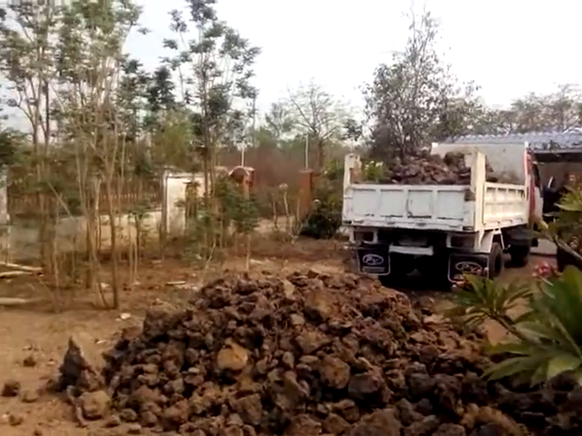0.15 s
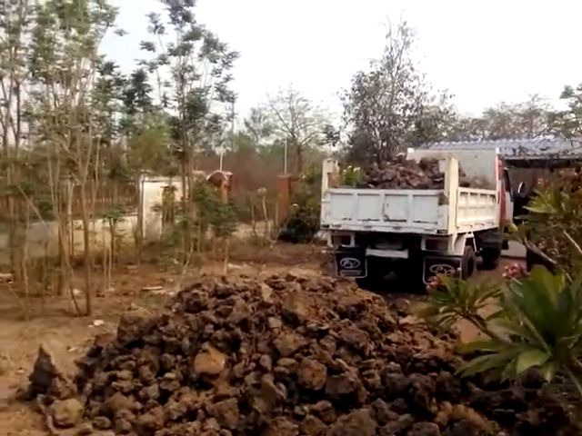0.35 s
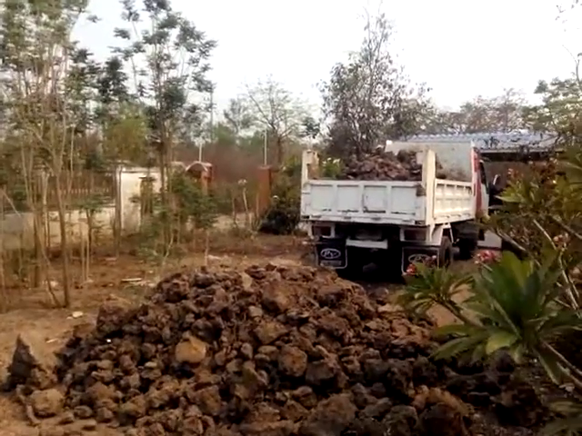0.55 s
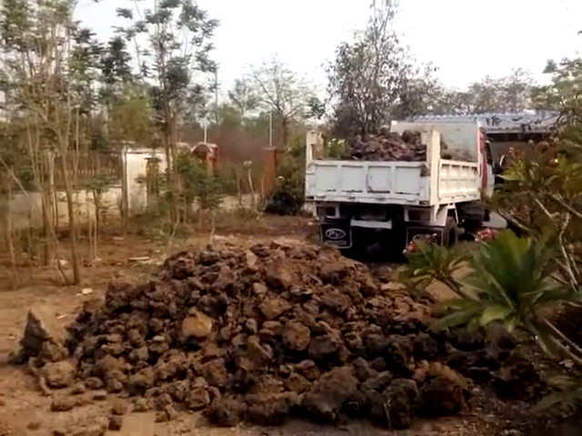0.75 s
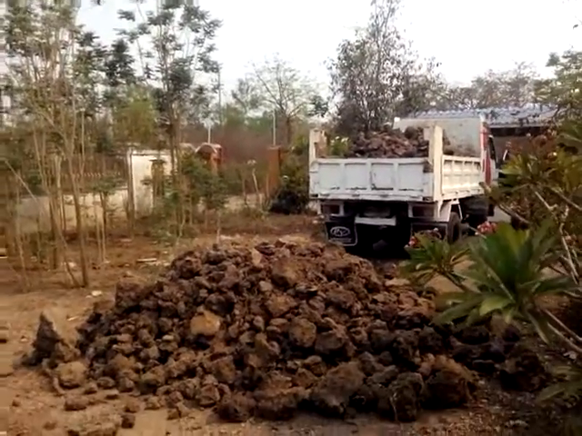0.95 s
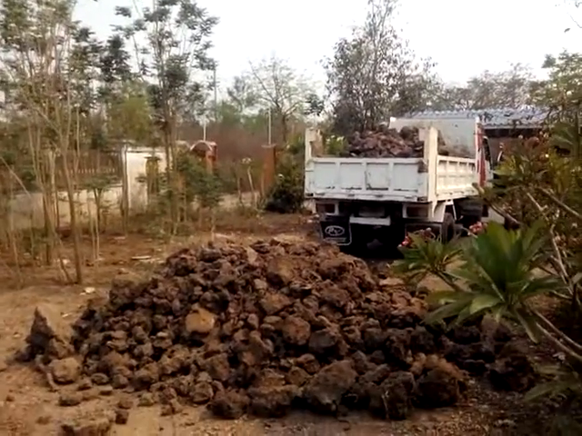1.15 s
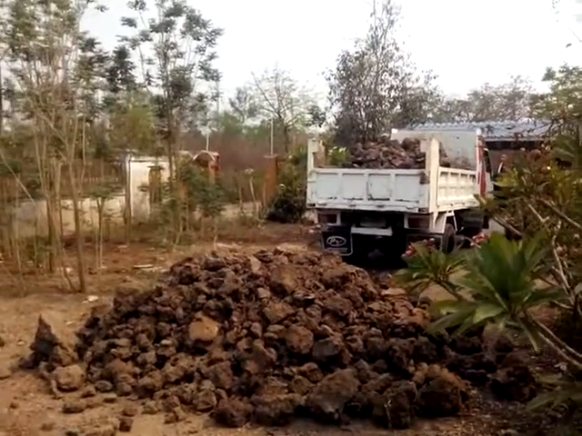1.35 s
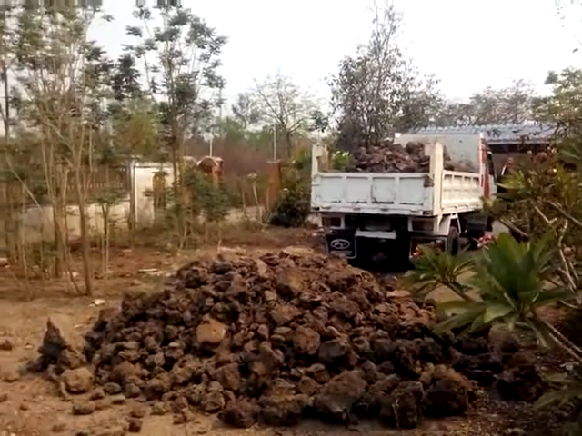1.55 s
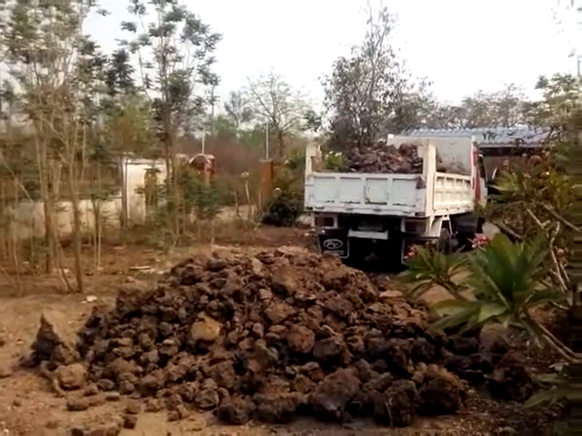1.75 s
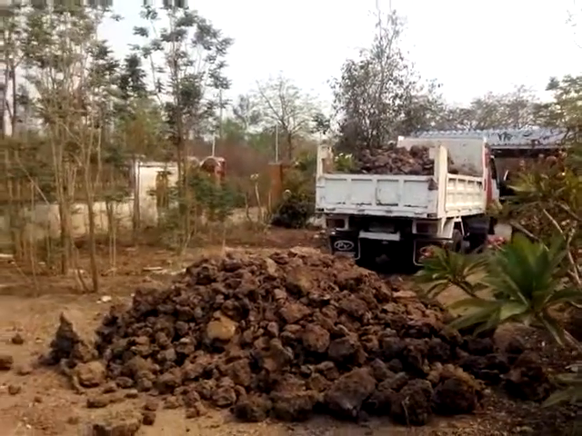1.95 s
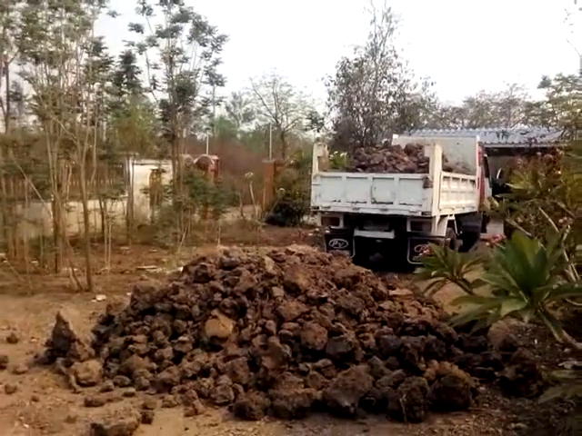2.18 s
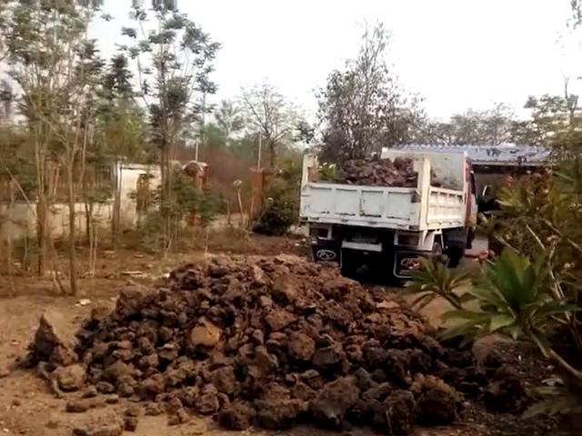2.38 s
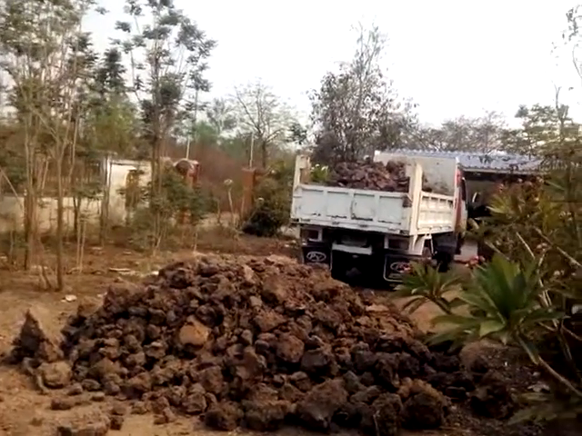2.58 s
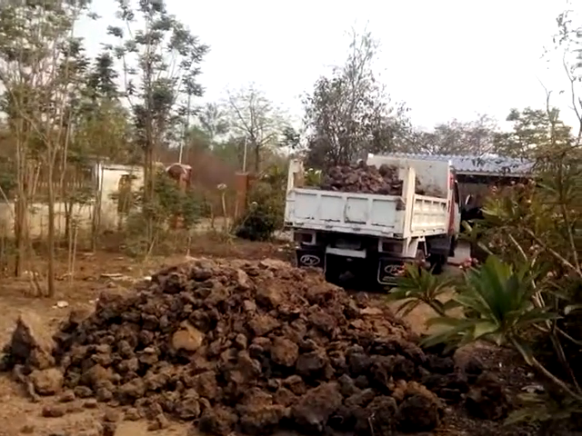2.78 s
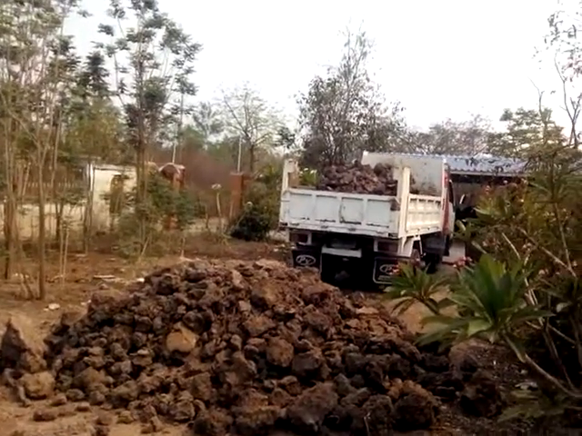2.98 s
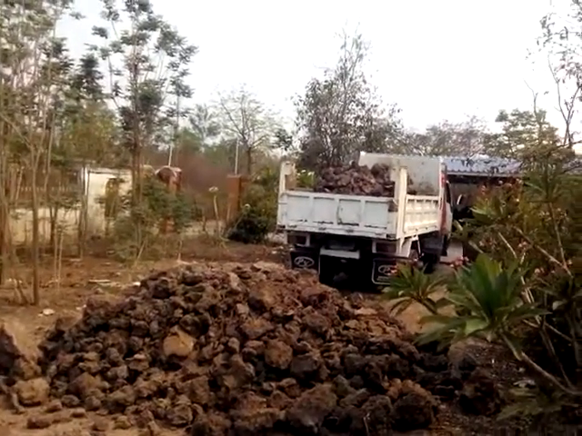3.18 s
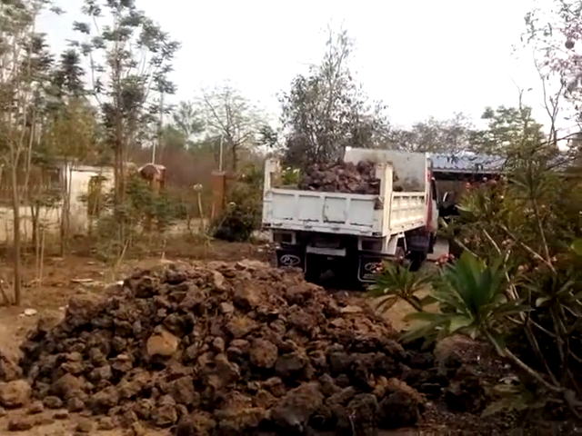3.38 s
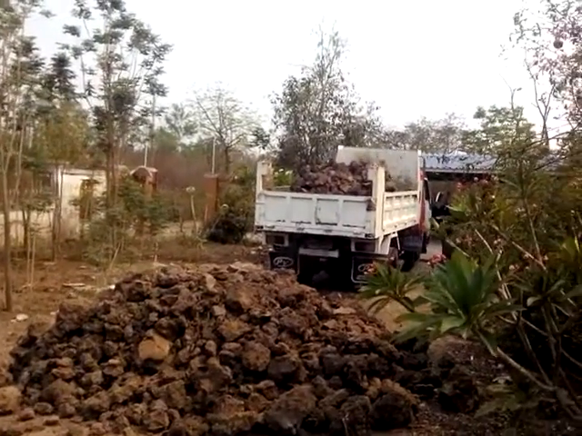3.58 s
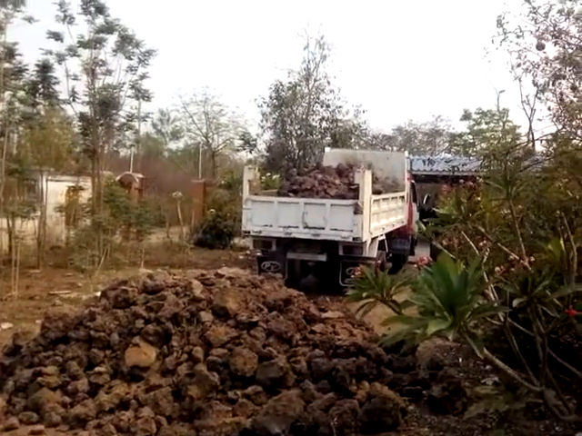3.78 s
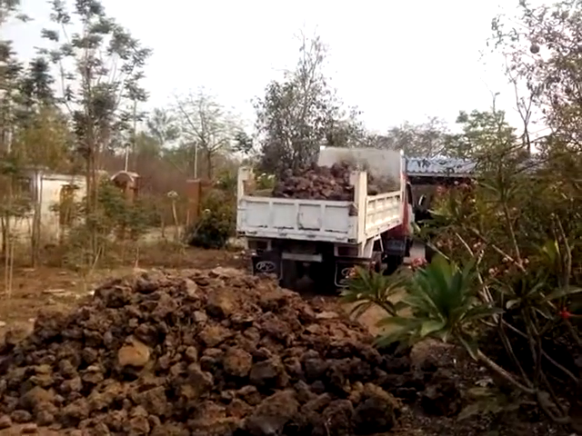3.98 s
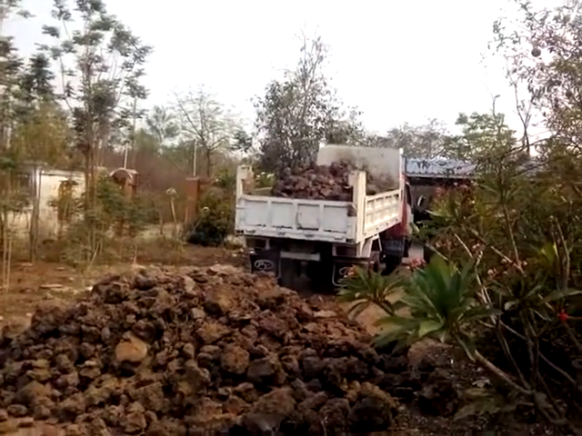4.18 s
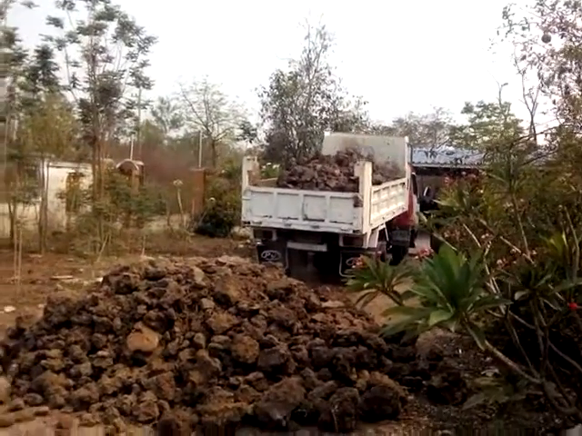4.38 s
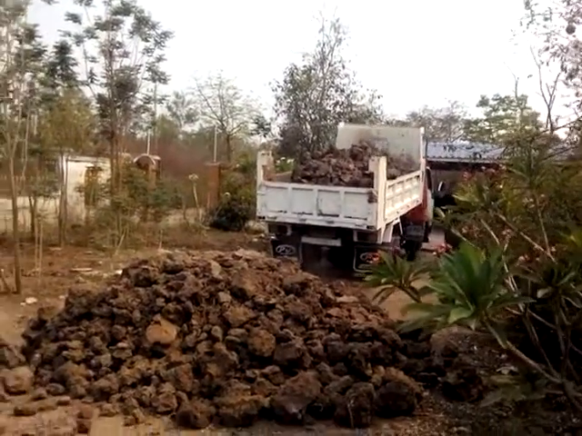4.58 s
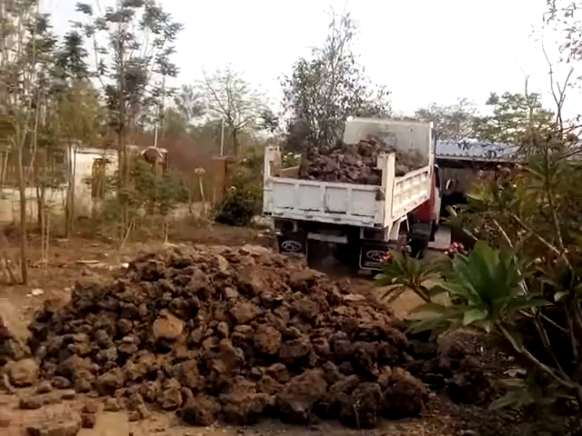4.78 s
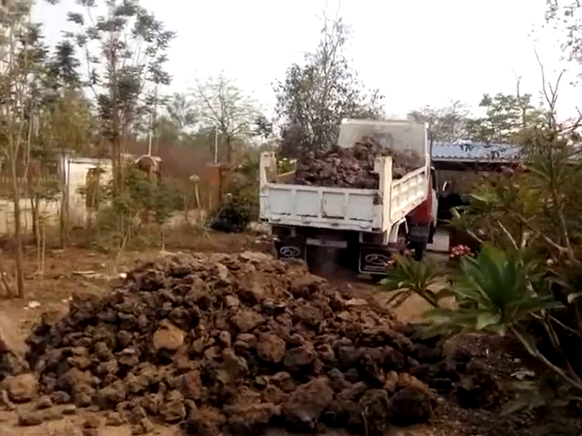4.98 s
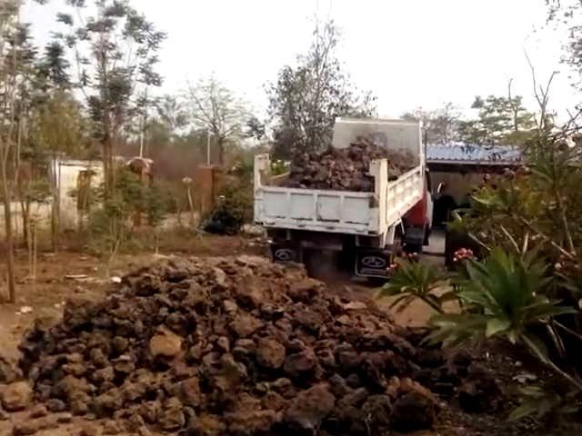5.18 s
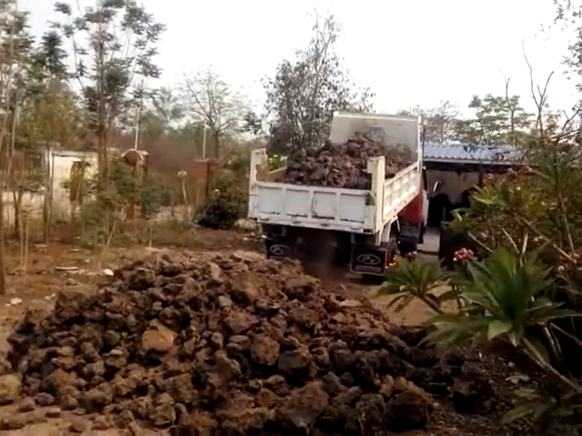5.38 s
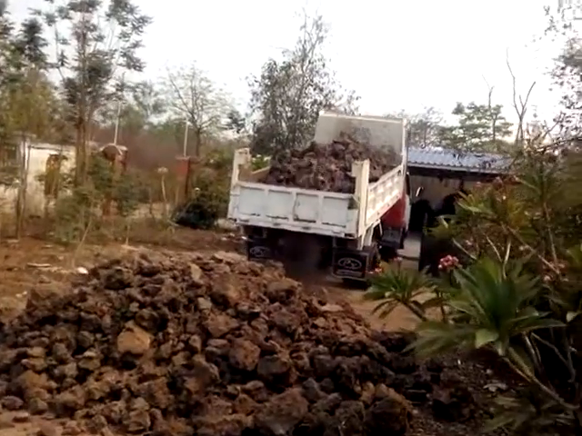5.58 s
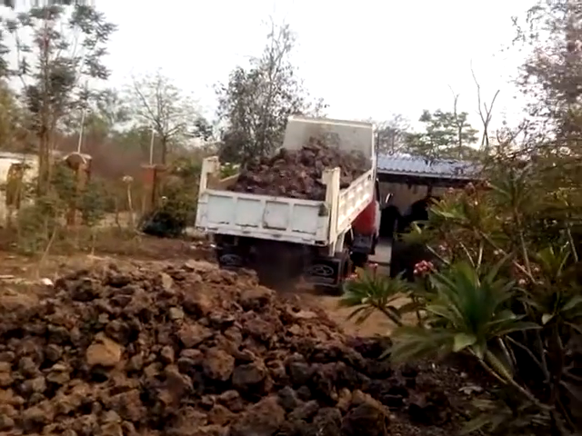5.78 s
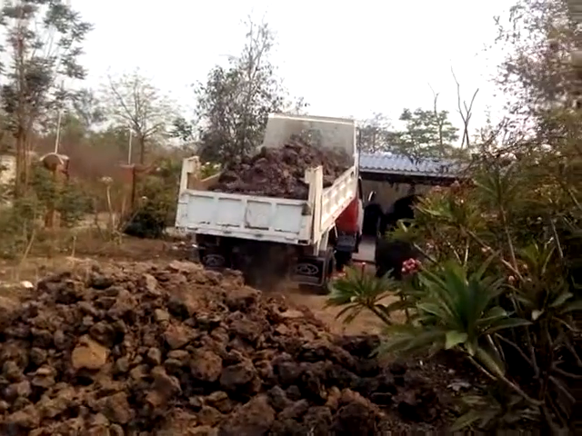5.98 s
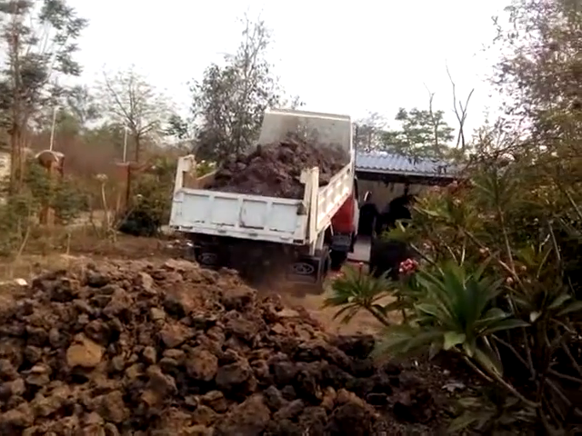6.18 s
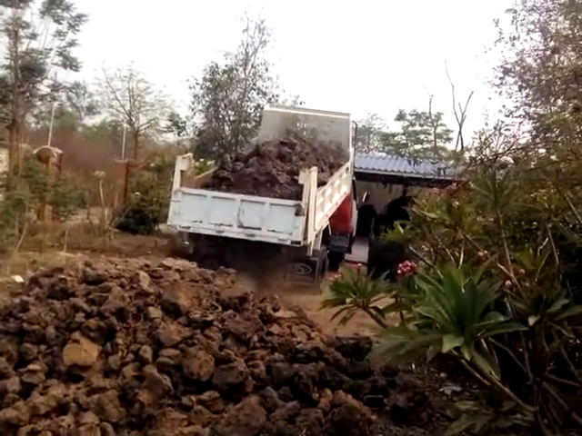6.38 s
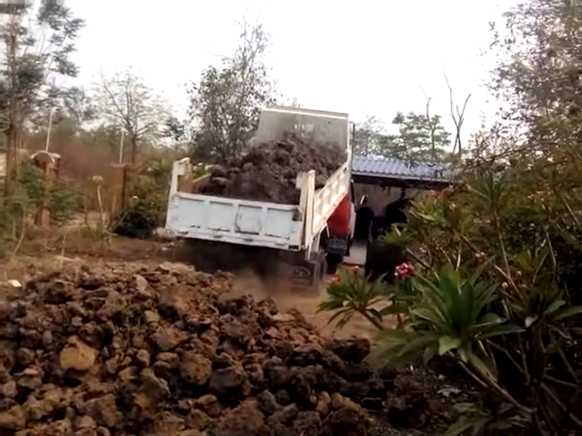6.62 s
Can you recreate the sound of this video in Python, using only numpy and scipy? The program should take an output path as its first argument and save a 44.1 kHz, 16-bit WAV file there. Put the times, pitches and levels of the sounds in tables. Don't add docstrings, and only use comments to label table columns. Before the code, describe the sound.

Low lumpy diesel idle with a tap on the microphone, then hard engine knocks as it revs up and holds a higher, louder roar.

```python
import sys
import numpy as np
from scipy import signal
from scipy.fft import rfft, irfft, next_fast_len
from scipy.io import wavfile
from scipy.ndimage import uniform_filter1d

SR = 44100
rng = np.random.default_rng(int(sys.argv[2]) if len(sys.argv) > 2 else 0)


def nominal_scale(level):
    x = np.asarray(level, float) / 20
    return 10 ** x


def output_pcm(signal):
    pcm = np.clip(np.atleast_2d(signal).T, -1, 1) * 32767
    wavfile.write(sys.argv[1], SR, np.round(pcm).astype(np.int16))


N = 293265

# t/s, firing rate f/Hz
FIRING_RATE = [(0.0, 34.29), (0.62, 34.03), (1.01, 32.63), (1.76, 33.0), (1.99, 34.51), (2.22, 39.05),
               (2.76, 39.42), (3.11, 50.86), (3.62, 74.65), (3.73, 77.05), (4.29, 83.35), (4.61, 88.42),
               (5.02, 88.17), (5.31, 94.84), (5.63, 92.11), (5.91, 92.55), (6.4, 95.9), (6.65, 97.44)]
# t/s, level/dB
EXHAUST_LOAD = [(0.0, -15.5), (0.4, -11), (1.0, -19), (1.8, -22), (1.95, -7), (2.2, -1.5), (2.75, 2.4),
                (2.9, -1.4), (3.0, 9), (3.25, 6), (3.45, 8.5), (3.8, 7.5), (4.3, 6), (4.6, 3.5), (5.0, 5),
                (5.2, 8.5), (5.6, 8), (6.65, 8)]
# t/s, throb share/1, throb lag/cycles
UNEVEN_PULL = [(0, .43, .18), (.4, .42, -.2), (.8, .55, -.13), (1.4, .88, -.13), (1.8, .72, -.15),
               (1.92, .36, -.15), (2.5, .42, -.12), (2.88, .46, -.24), (3.15, .17, 0), (3.3, .33, -.09),
               (3.6, .09, -.62), (4.4, .35, -.55), (4.55, .58, -.46), (4.72, .42, -.15), (5.0, .32, -.14),
               (5.3, .08, -.33), (6.65, .04, -.3)]
NOTE_LEVEL_DB = [-0.5, -0.27, -4.5, -0.94]
NOTE_LOAD_GROWTH = [1.29, 0.81, 1.19, 0.33]
NOTE_UNSTEADY_DB = [.4, .6, 1.8, 1.5]
NOTE_THROB = [1, .5, .5, 1.1]
# firing rate f/Hz, lead of the upper notes/rad
PUFF_SKEW = [(85, .9), (88, -1.9), (89, -1.9), (92, 0)]
# f/Hz, level/dB
TAILPIPE = [(30, -44), (63, -20), (108, -15), (121, -23.5), (162, -19.5), (167, -16.5), (195, -31),
            (400, -47)]
# f/Hz, width/Hz, level/dB
NOTE_BRANCHES = [(149.6, 2.3, -19.5), (50, 4.3, -12.5), (349, 6.3, 8), (249, 6, 7)]
# f/Hz, level/dB
ORDER_OUTLET = [(20, -59.5), (45, -27.5), (65, 1.5), (100, 1), (170, 4.5), (250, -5), (330, -9.5),
                (450, -32.5), (700, -26)]
# f/Hz, width/Hz, level/dB
ORDER_BRANCHES = [(200.5, 11, -9), (252.6, 16, 5), (92, 8, 5)]
ORDER_PLACE_DB = [-4, -7, -6, 0, -7, -5]
# f/Hz, level/(dB per Hz)
PUFF_SPECTRUM = [(18, -65.5), (35, -38.5), (60, -1.5), (100, 2.5), (170, -6), (260, -3.5), (330, -11),
                 (420, -25), (600, -31.5), (1100, -120)]
# start/s, rise/s, end/s, fall/s, level/dB
GEAR_WHINE = (3.65, .35, 5.1, .12, -42)
# start/s, rise/s, end/s, fall/s, level/dB
PANEL_HUM = (1.1, .3, 2.3, .3, -55.5)
# t/s, clatter level/dB, knock sharpness/1
BLOCK_EFFORT = [(0, -38.5, 0.3), (.9, -39, .5), (1.14, -40.5, .35), (1.71, -39, .3), (2.69, -36, 0.4),
                (2.8, -35, 0), (2.84, -32, 0.4), (3.14, -31, 0.3), (3.33, -23, .7), (3.4, -27.5, .15),
                (3.59, -25, 0.1), (3.7, -29, .1), (4.33, -27.5, .05), (4.53, -24, .15), (5.09, -27, 0.2),
                (5.4, -30, 0.2), (6.23, -31, .05), (6.55, -28.5, 0.4)]
# firing rate f/Hz, knock lag/firings
INJECTION_LAG = [(33, .34), (43, .68), (56, .35), (85, -.3)]
CYLINDER_KNOCK_DB = [-3, -4, 2.5, 0, 1.5, 1]
# f/Hz, level/(dB per Hz)
ROAR_SPECTRUM = [(240, -2.5), (400, -4.5), (454, -3), (516, -13.5), (545, -14), (751, -4), (858, -7),
                 (1090, -12), (1500, -16.5), (1950, -13.5), (3300, -120)]
# f/Hz, level/(dB per Hz)
CLATTER_SPECTRUM = [(710, -51.5), (1200, -13.5), (1530, -10.5), (1870, -7), (2020, -9), (2180, -3.5),
                    (3070, -1), (4670, -7), (5900, -7.5), (6730, -15.5), (7680, -22.5), (9980, -67.5),
                    (16900, -120)]
# f/Hz, width/Hz, level/dB
CASTING_MODES = [(2330, 74, -22.5), (3060, 350, -25), (2070, 210, -12), (800, 120, 16)]
# firing rate f/Hz, level/dB
PIPE_PING = [(32.5, -45), (35, -50), (40, -50), (46, -43), (64, -42), (97, -50)]
# f/Hz, width/Hz, level/dB
PIPE_MODES = [(2610, 45, 4), (2960, 70, -7), (2200, 60, -9), (3320, 60, -8), (3660, 60, -12),
              (1900, 50, -12)]
# t/s, peak level/dB, f/Hz
HARD_KNOCKS = [
    (2.5626, -34, 2390),
    (2.822, -26.5, 2400),
    (2.9597, -25.5, 2300),
    (3.1926, -28, 2180),
    (3.2271, -22, 2890),
    (3.2994, -25.5, 3110),
    (3.327, -21.5, 3110),
    (3.3927, -24, 2930),
    (3.4822, -22, 3110),
    (5.1409, -23, 2990),
]
# t/s, level/dB, f/Hz
PHONE_TAPS = [
    (1.1028, -22, 1020),
    (0.95, -36, 1000),
]
# start/s, rise/s, end/s, fall/s, level/dB
LEAF_GUST = (-2.8, 3.25, .68, .22, -35)
# f/Hz, level/(dB per Hz)
YARD_SPECTRUM = [(900, -20), (1200, -10), (2200, -5), (3000, -6), (3450, -4), (3750, 0), (4100, -5),
                 (5900, -8), (7680, -24), (9900, -70)]
# t/s, level/dB, half length/s
AIR_LEAKS = [
    (1.231, -38, 0.025),
    (1.684, -41.5, 0.022),
    (2.45, -38.5, 0.026),
    (2.586, -41.5, 0.029),
    (2.725, -39.5, 0.016),
    (1.994, -45, 0.028),
]
# f/Hz, level/(dB per Hz)
LEAK_SPECTRUM = [(2500, -75), (4200, -7), (5500, -2.5), (6500, -6), (7600, -12.5), (9000, -78.5)]
# f/Hz, left-right likeness/1
PORT_LIKENESS = [(60, 0.9), (110, 1.0), (200, 0.97), (360, 0.95), (660, 0.88), (1200, 0.63), (2180, 0.89),
                 (3970, 0.42), (7230, -0.91)]
# f/Hz, left minus right/dB
PORT_LEAN = [(60, 0), (100, 1), (170, 2), (300, 0), (500, 2.5), (860, 1), (1460, 3), (2490, 2), (4250, 0),
             (7230, -8.5)]

MIDDLE_EFFORT_DB, MIDDLE_HZ = -30, 55


def unit(x):
    return x / np.sqrt(np.mean(x ** 2) + 1e-20)


def along(points, hz):
    f, v = np.transpose(points)
    return np.interp(np.log(hz + 1), np.log(f + 1), v)


def curves(rows):
    s, *cols = np.transpose(rows)
    return [np.interp(np.arange(N) / SR, s, c) for c in cols]


def wobble(rate_hz):
    knots = rng.standard_normal(int(N * rate_hz / SR) + 4)
    return np.interp(np.arange(N) * rate_hz / SR, np.arange(len(knots)), knots)


def swell_db(start_s, rise_s, end_s, fall_s, db):
    times_s = [start_s, start_s + rise_s, end_s, end_s + fall_s]
    return np.interp(np.arange(N) / SR, times_s, [db - 25, db, db, db - 25])


def filtered(x, response):
    m = next_fast_len(N + 8192)
    return irfft(rfft(x, m) * response(np.fft.rfftfreq(m, 1 / SR)), m)[..., :N]


def rush(spectrum, gate, patchy_db):
    z = signal.stft(gate * rng.standard_normal((2, N)), nperseg=256)[2]
    field = uniform_filter1d(rng.standard_normal(z.shape[1:]), 3, 0)
    field = uniform_filter1d(field, 12, 1)
    pair = signal.istft(z * nominal_scale(patchy_db * unit(field)), nperseg=256)[1][:, :N]

    def mid_side(hz):
        turn = np.arccos(np.clip(along(PORT_LIKENESS, hz), -1, 1)) / 2
        return nominal_scale(along(spectrum, hz)) * [np.cos(turn), np.sin(turn)]

    mid, side = filtered(pair, mid_side)
    return unit(np.array([mid + side, mid - side]))


def bumps_db(hz, table):
    return sum(db / (1 + ((hz - c) / w) ** 2) for c, w, db in table)


def modes(f, table):
    return sum((-1) ** k * nominal_scale(db) * 1j * f * w / (c * c - f * f + 1j * f * w)
               for k, (c, w, db) in enumerate(table))


def cycles():
    return np.cumsum(curves(FIRING_RATE)[0]) / SR / 6


def octaves():
    return np.log2(curves(FIRING_RATE)[0] / MIDDLE_HZ)


def throb(share):
    upper, lag_cycles = curves(UNEVEN_PULL)
    lower = .36 * upper
    swing = np.exp(2j * np.pi * (cycles() - lag_cycles))
    return 1 + share * (upper * swing + .5 * lower / swing - .25 * lower * (swing ** 2).real)


def exhaust_notes():
    firing_hz, load_db = curves(FIRING_RATE)[0], curves(EXHAUST_LOAD)[0]
    skew = along(PUFF_SKEW, firing_hz)
    starts_rad = [-2.4, -3.8, .4, 1.3]
    notes = 0
    for i, start in enumerate(starts_rad):
        k = i + 1
        outlet_db = along(TAILPIPE, k * firing_hz) + bumps_db(k * firing_hz, NOTE_BRANCHES)
        level_db = NOTE_LEVEL_DB[i] + NOTE_LOAD_GROWTH[i] * load_db + outlet_db
        gain = nominal_scale(level_db + NOTE_UNSTEADY_DB[i] * wobble(14))
        phase = 12 * np.pi * k * cycles() + start + (k > 1) * skew
        notes = notes + gain * throb(NOTE_THROB[i]) * np.exp(1j * phase)
    return notes.real


def between_orders(clears_db):
    firing_hz, angle, block = curves(FIRING_RATE)[0], 2 * np.pi * cycles(), 128
    sparse = np.arange(0, N, block)
    tilt_db = (-2.5 + 5 * octaves())[sparse]
    power, total = 0, 0
    for k in range(3, 42):
        if not (k > 25 or k % 6 in (2, 3, 4) or k in (11, 17)):
            continue
        hz = k * firing_hz[sparse] / 6
        level_db = along(ORDER_OUTLET, hz) + (k < 26) * bumps_db(hz, ORDER_BRANCHES)
        level_db = level_db + ORDER_PLACE_DB[k % 6] - 5 * (k in (8, 9))
        level_db = level_db + (k % 3 > 0) * clears_db[sparse]
        gain = np.repeat(nominal_scale(level_db + tilt_db * np.log2(hz / 150)), block)[:N]
        power = power + gain ** 2
        phase = k * angle + 6.3 * rng.random() + k / 40 * wobble(6)
        total = total + gain * nominal_scale((1.2 + k / 15) * wobble(4)) * np.cos(phase)
    return total / np.sqrt(power)


def exhaust():
    clears_db = -3.5 * np.maximum(octaves(), 0)
    fuel_db = curves(BLOCK_EFFORT)[0] - MIDDLE_EFFORT_DB
    between_db = -22.5 + 0.78 * fuel_db + 0.18 * curves(EXHAUST_LOAD)[0] - 6 * octaves()
    upper = curves(UNEVEN_PULL)[0]
    swell = (np.abs(throb(.7)) / np.sqrt(1 + .5 * upper ** 2)) ** .7
    hum = np.sqrt(2) * (exhaust_notes() + nominal_scale(between_db) * swell * between_orders(clears_db))
    puffs = rush(PUFF_SPECTRUM, 1 + .6 * np.cos(12 * np.pi * cycles()), patchy_db=1.5)
    return hum + nominal_scale(between_db - 7 + 1.6 * clears_db) * swell * puffs


def block():
    (clatter_db, sharp), firing_hz = curves(BLOCK_EFFORT), curves(FIRING_RATE)[0]
    roar_db = -34 + 0.77 * (clatter_db - MIDDLE_EFFORT_DB) + octaves()
    firings = 6 * cycles() - along(INJECTION_LAG, firing_hz) + 6
    which = firings.astype(int)
    since_s = (firings - which) / firing_hz
    size = nominal_scale(np.take(CYLINDER_KNOCK_DB, which % 6) + 1.8 * rng.standard_normal(2000)[which])
    knock = size * nominal_scale(-60 * since_s / .08) * (1 - np.exp(-since_s / .001))
    sharp = np.clip(sharp, 0, 1)
    gate = 1 - sharp + 1.75 * sharp * knock
    gate = gate / np.sqrt(uniform_filter1d(gate ** 2, size=9000))
    clatter = rush(CLATTER_SPECTRUM, gate, patchy_db=1.32)
    clatter = unit(filtered(clatter, lambda f: 1 + modes(f, CASTING_MODES)))
    roar = rush(ROAR_SPECTRUM, gate ** 0.2, patchy_db=1.0)
    ping = unit(filtered(knock ** 1.3 * rng.standard_normal(N), lambda f: modes(f, PIPE_MODES)))
    ping = nominal_scale(along(PIPE_PING, firing_hz) + 0.83 * wobble(12)) * ping * nominal_scale([[2.5], [-2.5]])
    return nominal_scale(clatter_db + 0.47 * wobble(8)) * clatter + nominal_scale(roar_db + 1.5 * wobble(5.3)) * roar + ping


def hits(events, t60_s, noisy, boost_db, snap=0):
    out, t = np.zeros(N + SR), np.arange(9000) / SR
    rise = 1 - np.exp(-t / 0.00091)
    first_crack = 1 + snap * nominal_scale(-60 * t / .025)
    for s, db, hz in events:
        band = signal.butter(2, [.7 * hz, 1.45 * hz], "band", fs=SR)
        crack = signal.lfilter(*band, rng.standard_normal(len(t)))
        ring = (1 - noisy) * np.sin(2 * np.pi * hz * t) + noisy * unit(crack)
        out[round(s * SR):][:len(t)] += nominal_scale(db + boost_db - 60 * t / t60_s) * rise * first_crack * ring
    return out[:N]


def pump_gear():
    level = nominal_scale(swell_db(*GEAR_WHINE) + 4 * wobble(14))
    return np.sqrt(2) * level * np.cos(66 * np.pi * cycles() + .8 * wobble(14))


def body_panel():
    level = (nominal_scale(swell_db(*PANEL_HUM)) + nominal_scale(-61)) * nominal_scale(1.5 * wobble(6))
    return np.sqrt(2) * level * np.cos(2 * np.pi * 792 * np.arange(N) / SR + .4 * wobble(12))


def yard():
    t = np.arange(N) / SR
    leaks = sum(nominal_scale(db) * np.exp(-((t - s) / half_s) ** 2) for s, db, half_s in AIR_LEAKS)
    stirred_db = -54 + 0.65 * (curves(BLOCK_EFFORT)[0] - MIDDLE_EFFORT_DB)
    air = (nominal_scale(swell_db(*LEAF_GUST)) + nominal_scale(stirred_db)) * nominal_scale(0.78 * wobble(8.5))
    return air * rush(YARD_SPECTRUM, 1, patchy_db=1.8) + leaks * rush(LEAK_SPECTRUM, 1, patchy_db=1.3)


def scene():
    knocks = hits(HARD_KNOCKS, t60_s=.3, noisy=.85, boost_db=-4, snap=1.8)
    taps = hits(PHONE_TAPS, t60_s=0.0035, noisy=0.12, boost_db=20.5)
    return exhaust() + block() + knocks + taps + pump_gear() + body_panel() + yard()


def top_cut(x):
    return signal.sosfilt(signal.butter(12, 7830, fs=SR, output="sos"), x)


def record(dry):
    def port_response(hz):
        return nominal_scale(np.outer([.5, -.5], along(PORT_LEAN, hz))) / (1 + (hz / 7300) ** 16)

    ports = filtered(dry, port_response)
    held = ports / (1 + np.abs(ports / 1.04) ** 6) ** (1 / 6)
    return top_cut(held)


dry = scene()
out = record(dry)
output_pcm(out)
```